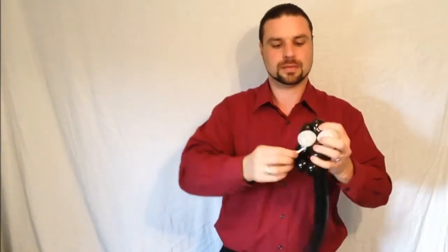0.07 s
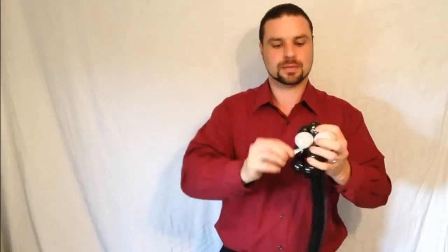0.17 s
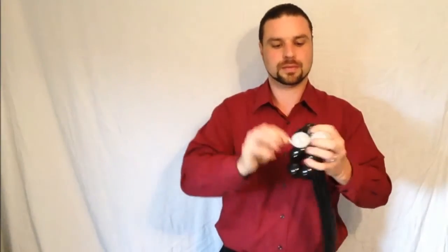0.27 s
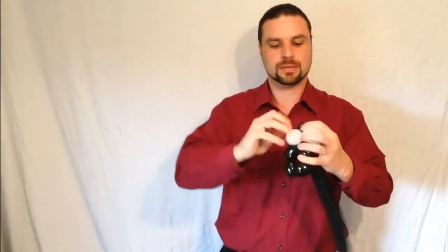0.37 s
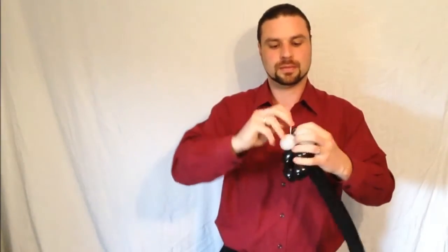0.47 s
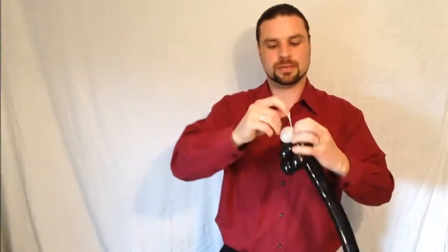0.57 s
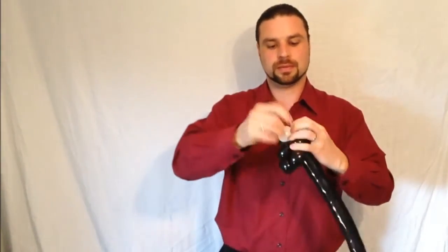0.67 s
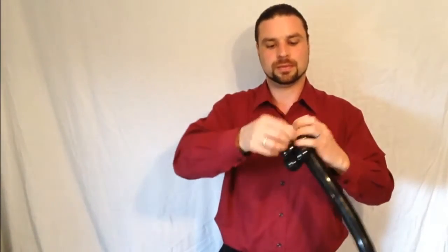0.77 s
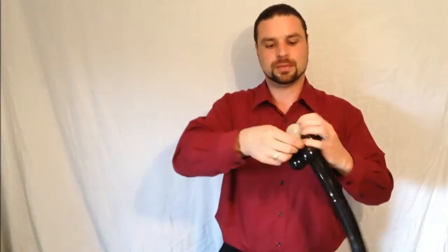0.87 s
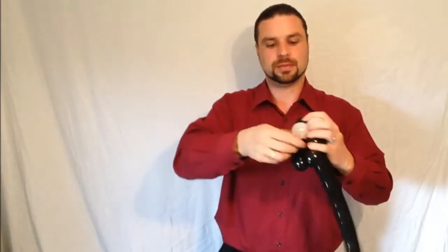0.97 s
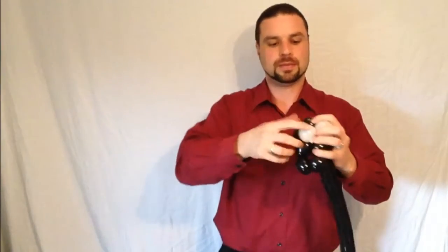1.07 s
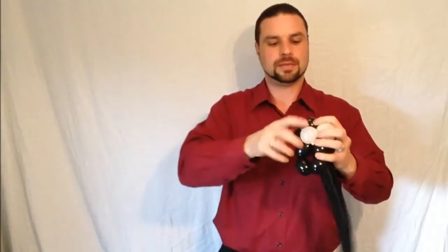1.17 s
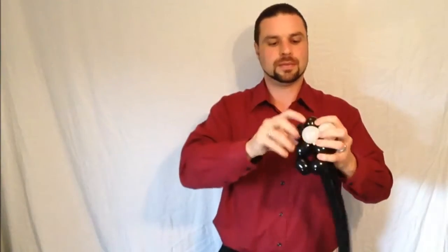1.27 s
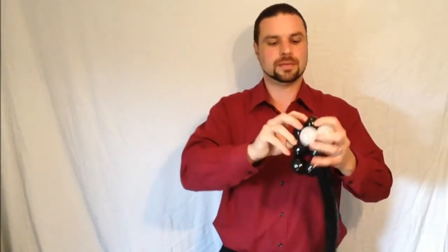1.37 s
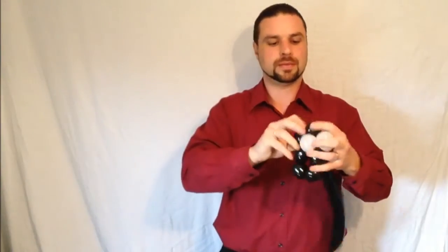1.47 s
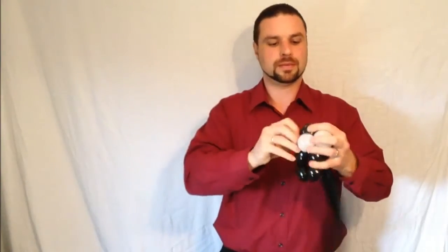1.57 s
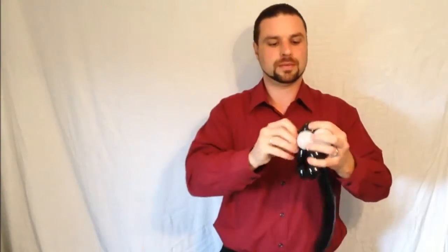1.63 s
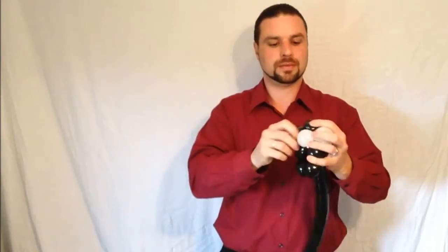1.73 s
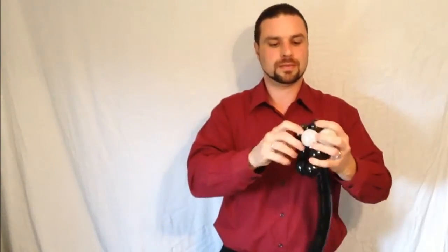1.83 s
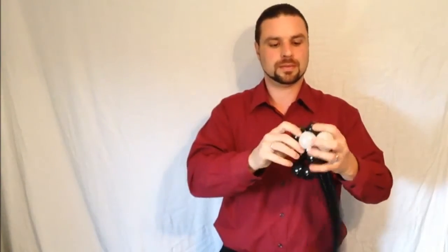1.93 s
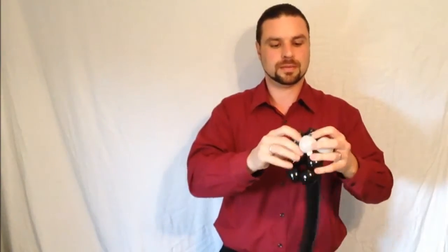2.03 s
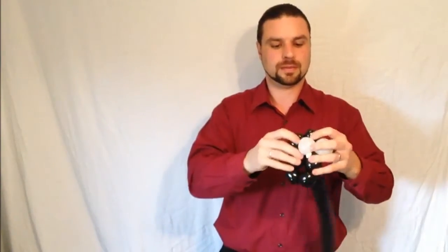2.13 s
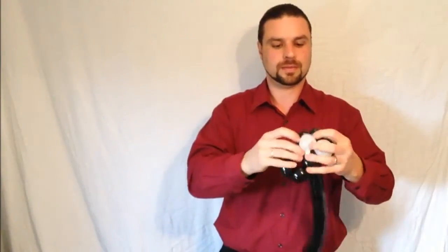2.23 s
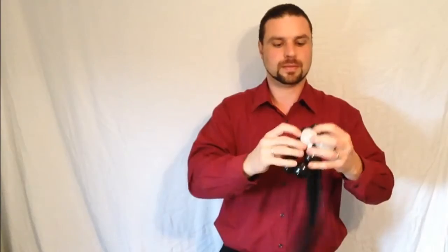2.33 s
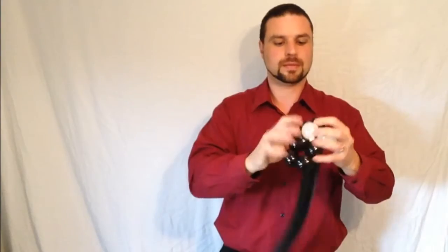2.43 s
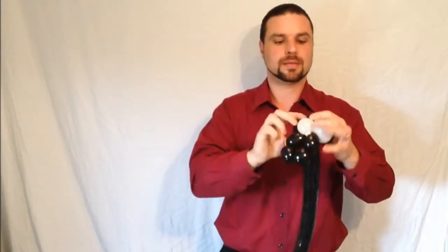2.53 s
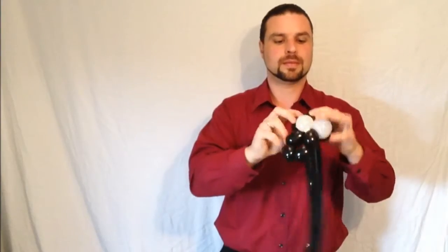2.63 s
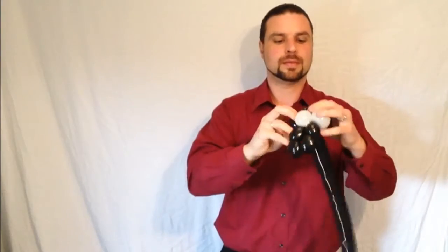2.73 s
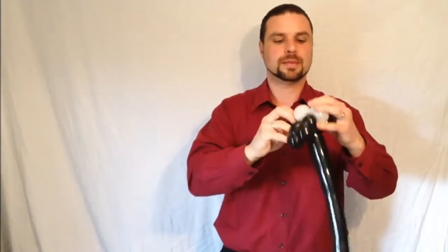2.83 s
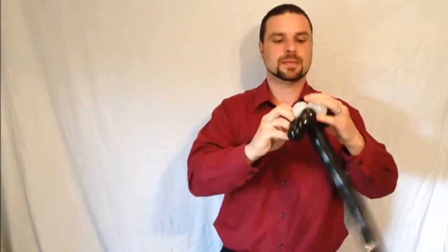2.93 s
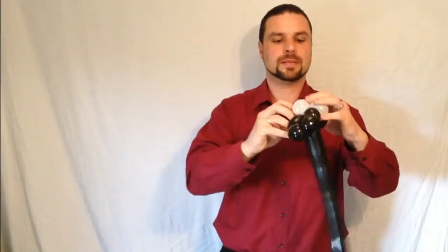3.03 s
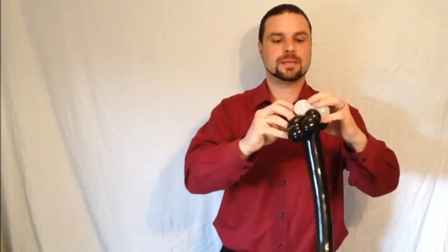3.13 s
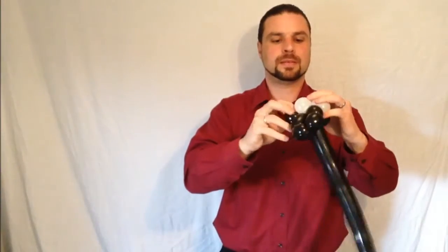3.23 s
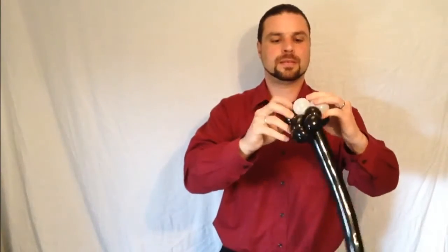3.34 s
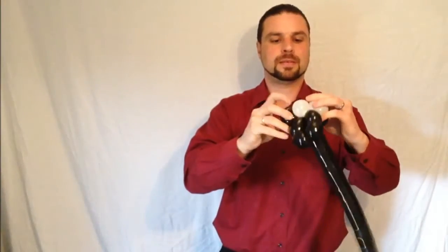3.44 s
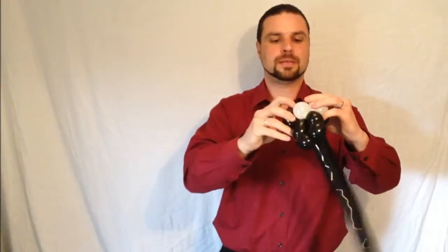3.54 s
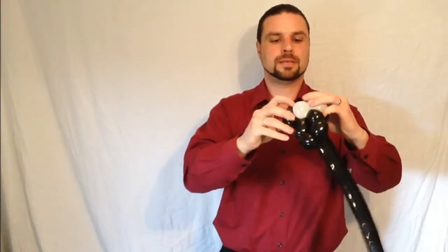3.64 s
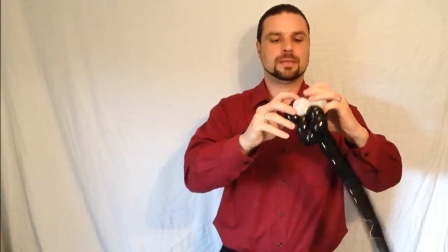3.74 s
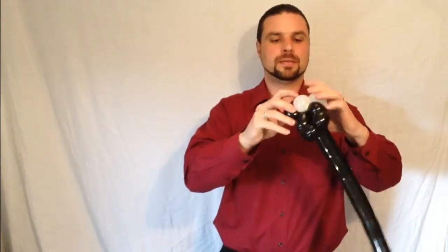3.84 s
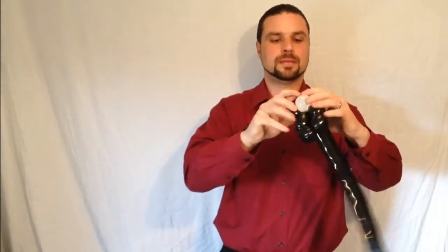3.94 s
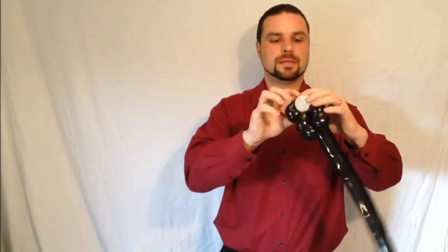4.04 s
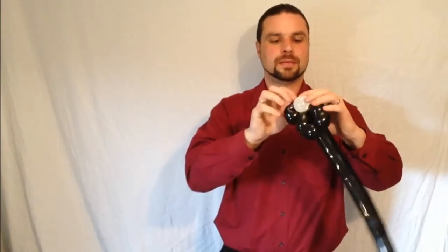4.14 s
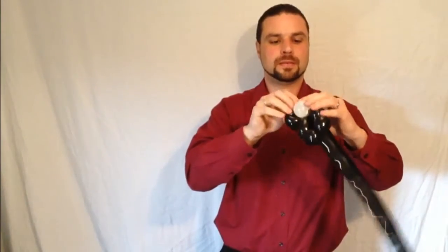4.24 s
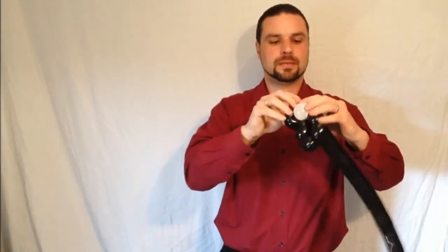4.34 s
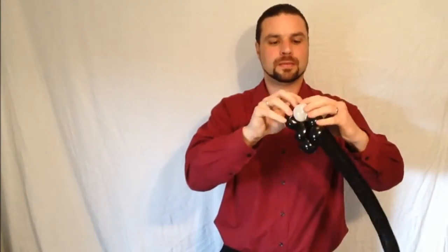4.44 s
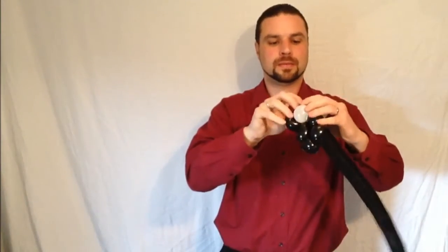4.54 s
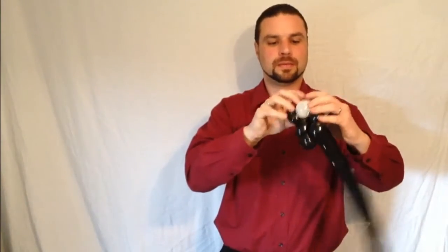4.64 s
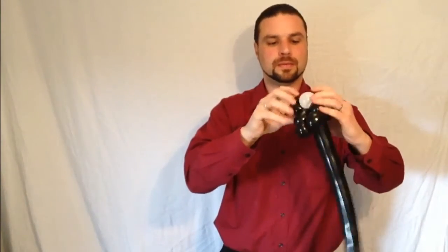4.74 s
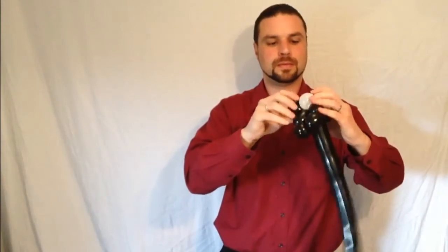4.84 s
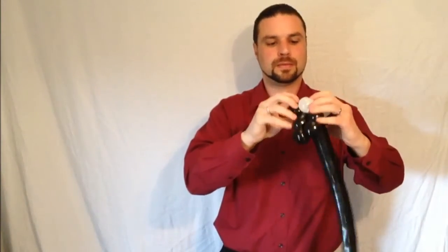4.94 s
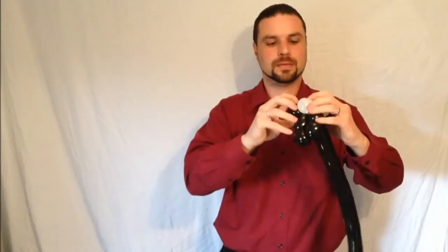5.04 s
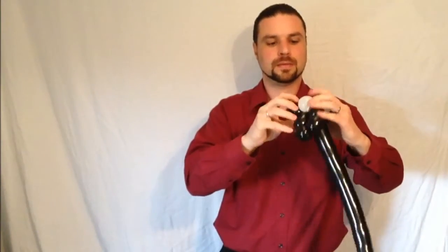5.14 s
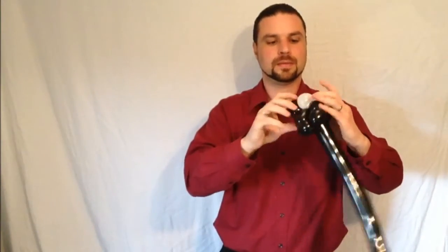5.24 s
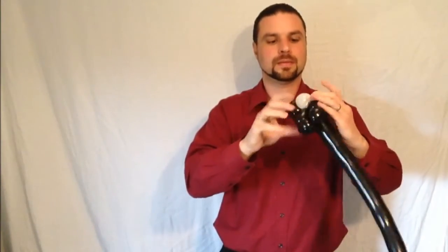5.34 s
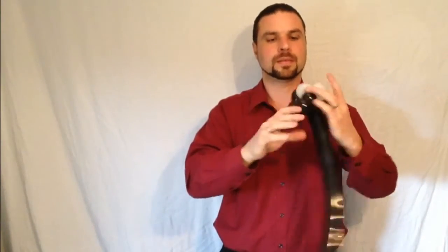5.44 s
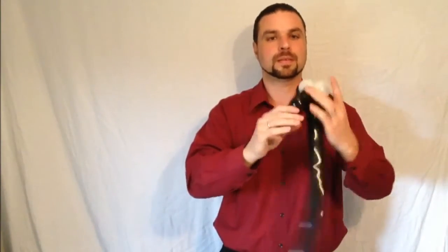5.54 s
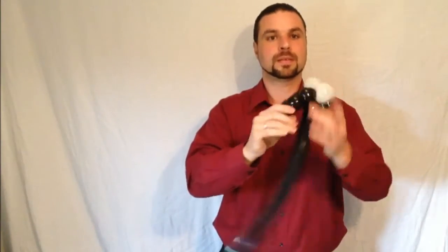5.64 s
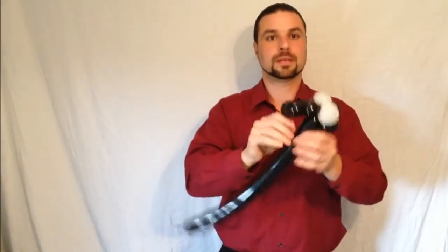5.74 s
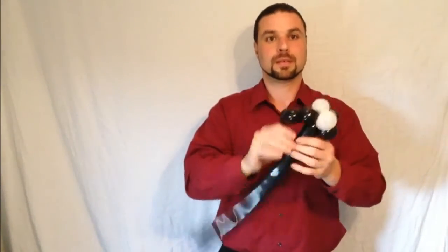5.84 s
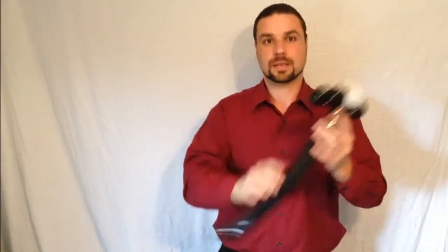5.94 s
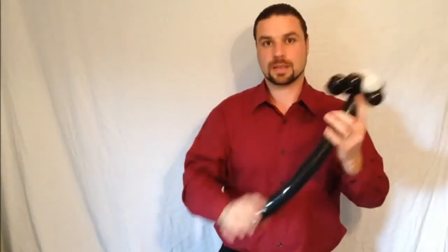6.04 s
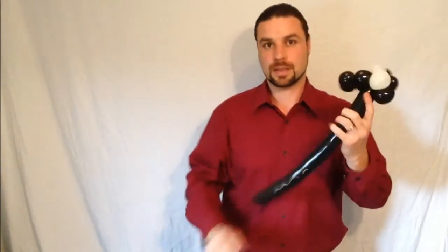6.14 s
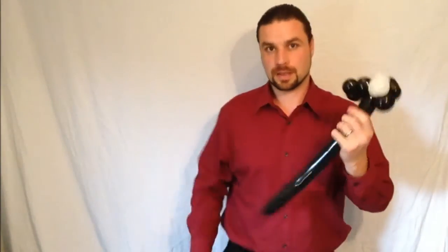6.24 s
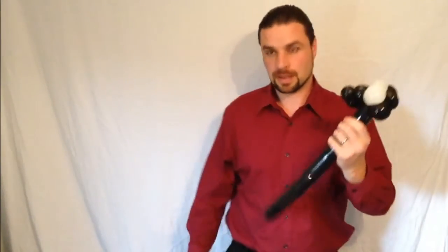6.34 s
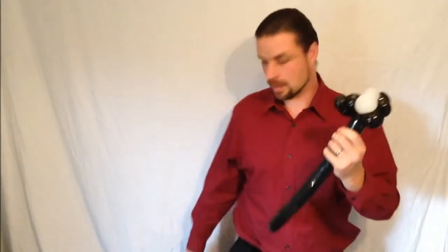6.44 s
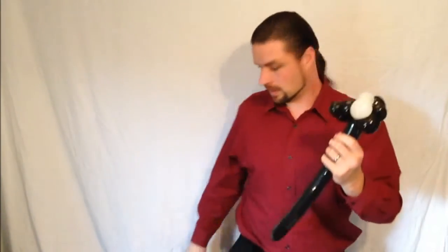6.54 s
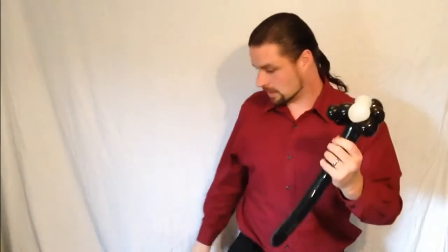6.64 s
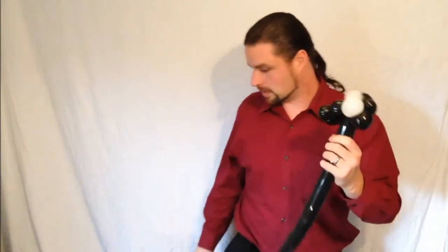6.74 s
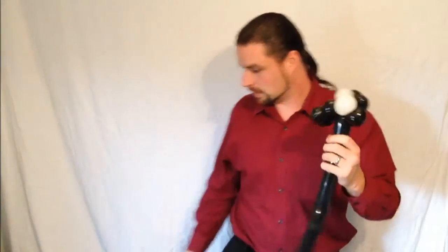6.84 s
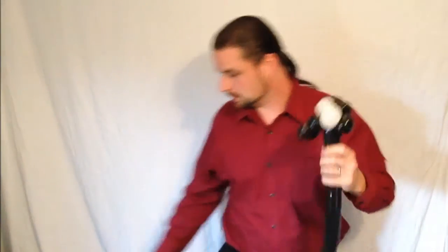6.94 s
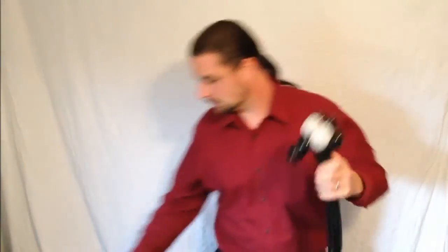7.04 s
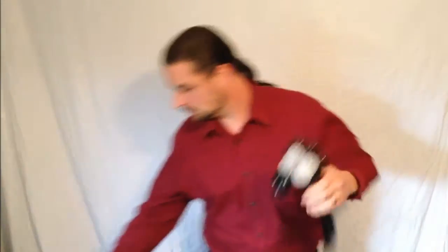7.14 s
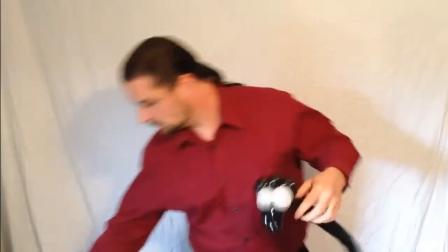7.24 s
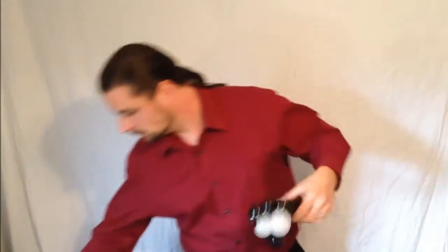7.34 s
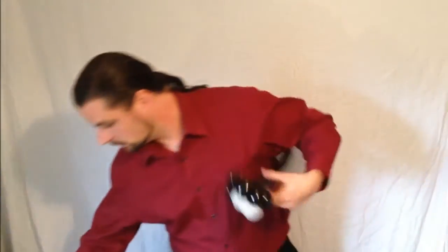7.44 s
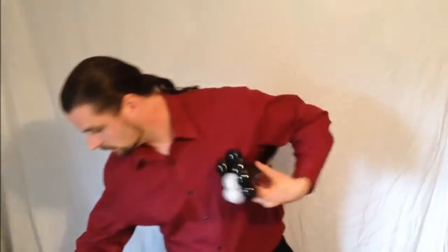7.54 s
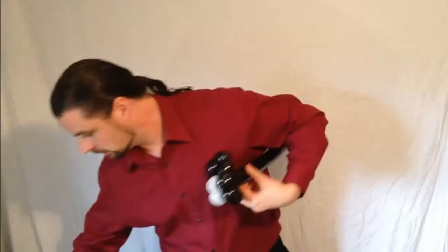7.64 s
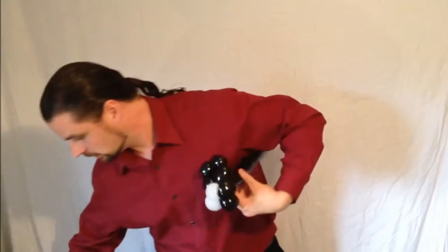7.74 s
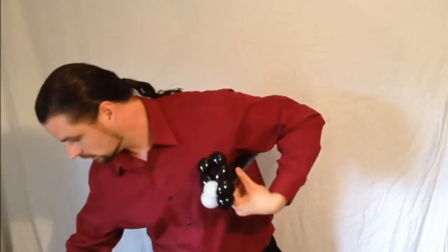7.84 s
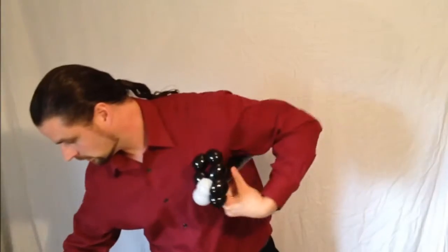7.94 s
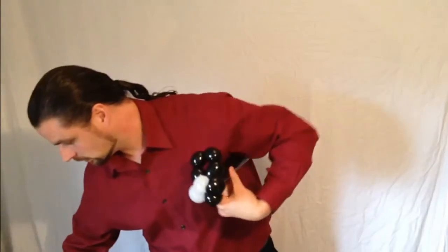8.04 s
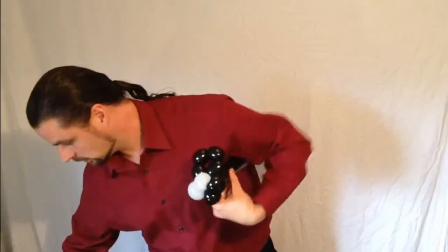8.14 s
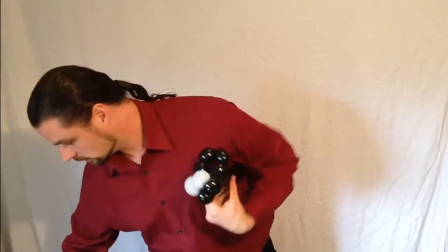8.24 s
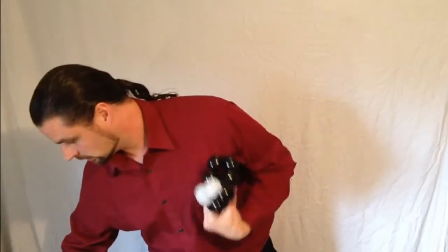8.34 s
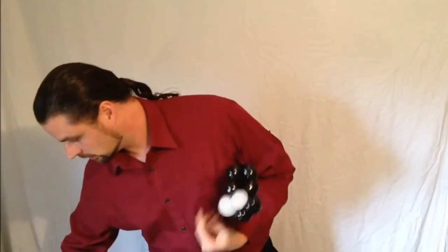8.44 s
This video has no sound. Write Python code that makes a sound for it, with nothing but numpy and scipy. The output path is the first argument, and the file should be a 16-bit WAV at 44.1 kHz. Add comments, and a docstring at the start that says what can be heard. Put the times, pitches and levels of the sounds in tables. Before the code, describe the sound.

Taut rubber sticks and slips under busy fingers: grainy creaks, peeling crackles, hollow knocks and crisp snaps, tightly spaced with tiny gaps. A rough, short squeak rises around one and three-quarter seconds. The bursts thin slightly toward five seconds, then drop sharply in level, leaving small squeaks, light taps and a faint closing rub. Close indoor pickup, short room reflections, low hiss, little deep bass.

```python
"""Inflated latex balloons are twisted together by hand in a small, quiet room with a faint steady hiss.
From the start the rubber sticks and slips: runs of tiny slips creak, patches peel with sharp ticks.
Soon knocks and seams letting go snap, then fast regular slips squeak; each slip rings the taut skin briefly.
After about 5.7 s all contacts are much fainter: the figure is only held and tucked under an arm."""
import sys
import numpy as np
from scipy import signal
from scipy.fft import rfft, irfft, next_fast_len
from scipy.io import wavfile
from scipy.ndimage import uniform_filter1d, map_coordinates

SR = 44100
rng = np.random.default_rng(int(sys.argv[2]) if len(sys.argv) > 2 else 0)


def unload_audio(sound):
    """Save the sound as a 16-bit wav file, at the path given as the first command line argument."""
    columns = np.transpose(np.atleast_2d(sound))
    # keep every value between -1 and 1, then stretch to whole-number steps
    steps = np.round(np.clip(columns, -1, 1) * 32767)
    wavfile.write(sys.argv[1], SR, steps.astype(np.int16))


N = 374850

# still room, spectral density: f/Hz, level/dB (relative)
HISS_SPECTRUM = [(100, -17.5), (204, -8), (1030, -13), (15500, -19)]
# taut skin, spectral density of its ring: f/Hz, level/dB (relative)
SKIN_SPECTRUM = [(100, -62), (150, -21), (255, -11.5), (430, -5), (1010, -3.5), (1380, -1.6), (1620, -3.5),
                 (2120, -1), (8230, -20), (15500, -23.5)]
# where the hands rub, soft bubble to tight twist: t/s, hollow body/dB, crisp treble/dB, held bubble's note f/Hz
GRIPS = [(0.3, 8, 7.5, 1350), (0.75, 2.5, 4.5, 1350), (1.05, 6.5, 2, 1210), (1.5, -7, 5.5, 1298),
         (2.3, 0, 6, 1364), (2.6, 7.5, 1, 760), (3.0, -10.5, 5, 1410), (3.5, 0, 6, 750),
         (3.75, -4.5, 0.5, 814), (4.3, -4.5, 7.5, 1286), (5.0, -5, 3, 870), (5.75, 3, 7.5, 800),
         (6.25, 5.5, 3, 776), (7.8, 13, 14, 648), (8.5, 8, 11, 524)]
# one turn or slide of the hands: start t/s, length t/s, mid level/dB (relative), swell start to end/dB
RUBS = [(0, 0.06, -31, -5.5), (0.174, 0.039, -44.5, -4), (0.238, 0.18, -36, 2), (0.427, 0.23, -31, -6.5),
        (0.737, 0.26, -37, -5), (0.92, 0.45, -38.5, -13.5), (1.349, 0.057, -34.5, 3.5),
        (1.43, 0.26, -26.5, -5), (1.809, .11, -32, 6.5), (1.995, 0.024, -29, -5.5), (2.059, 0.098, -32, 17),
        (2.212, 0.16, -33.5, -2.5), (2.434, 0.077, -32, -8), (2.534, 0.066, -30, 2.5),
        (2.693, 0.37, -33.5, 7), (2.941, 0.046, -28, 14.5), (3.098, 0.061, -30.5, 14),
        (3.214, 0.045, -31.5, 5.5), (3.321, 0.051, -35, -9.5), (3.373, 0.04, -33.5, 17.5),
        (3.51, 0.066, -40.5, -1), (3.589, 0.064, -31, -4.5), (3.673, 0.15, -36, 7),
        (3.919, 0.066, -41, 1.5), (4.076, 0.092, -39, -9.5), (4.222, 0.19, -29, 3.5),
        (4.51, 0.16, -29, -9.5), (4.826, 0.014, -39.5, -5), (4.91, 0.135, -36, 1), (5.081, 0.16, -38.5, 0),
        (5.351, 0.021, -40.5, -2), (5.717, 0.19, -56, -14.5), (5.958, 0.32, -52.5, 2),
        (7.52, 0.05, -61, -2), (7.78, 0.24, -59, -5.5), (8.223, 0.015, -53.5, -7), (8.05, 0.41, -57, 14)]
# seam lets go or finger knocks the skin: t/s, level/dB (relative), body/dB, treble/dB, tear decay t/s
SNAPS = [(0.2463, -28.5, 24, 4, 0.0086), (0.2992, -28, -22, 7.5, 0.00078), (0.4442, -22.5, -4, -1, 0.0037),
         (0.6795, -28, -5, -3, 0.0018), (0.698, -30.5, -8, -1, 0.0017), (0.7534, -24.5, -6, -5, 0.0026),
         (0.9222, -21.5, 3, -8.5, 0.0021), (1.275, -24.5, 2, 4.5, 0.003), (1.357, -31.5, -7, -4, 0.0013),
         (1.6232, -23.5, 2, 8.5, 0.0019), (1.6453, -22.5, 0, 6, 0.0034), (1.6873, -22.5, 2.5, 8, 0.0018),
         (1.6965, -24, 12, 6, 0.002), (2.0072, -31, -2, 3, 0.0015), (2.2, -25, -3, 2.5, 0.002),
         (2.231, -24.5, 15, 0, 0.0029), (2.2387, -20.5, 8.5, 4, 0.0015), (2.404, -23.5, -12, 7, 0.0061),
         (2.7764, -32.5, 1, 17, 0.0011), (2.8219, -12, -5.5, 1.5, 0.0011), (2.854, -28.5, 9, 10.5, 0.0024),
         (3.236, -25.5, -18, 7, 0.0031), (3.4208, -20, 4.5, 6.5, 0.002), (3.578, -28.5, -23, -0.5, 0.0027),
         (3.602, -22.5, -28, 11, 0.0018), (3.923, -35.5, 13, 6.5, 0.0031), (4.3874, -20.5, -15, 5, 0.0024),
         (4.51, -25.5, -6, 6, 0.00075), (4.644, -26.5, -7, 3, 0.0015), (4.8004, -41.5, 5, 4, 0.0012),
         (5.084, -34, 2, 7, 0.0032), (5.2633, -36.5, 5, 6, 0.0026), (5.5574, -36, -7, -2, 0.0032),
         (5.686, -47.5, 22, 13.5, 0.0033), (5.725, -41, 27, -5.5, 0.0034), (5.95, -50.5, 16, -3, 0.0018),
         (6.895, -48, -23, 4, 0.0011), (6.9428, -40, 3, 4, 0.0012), (7.091, -40, -4, 4.5, 0.00078),
         (7.118, -51, 19, 7, 0.0021), (7.2891, -47.5, 23, -5, 0.002), (7.733, -54, 19, -8, 0.002),
         (8.412, -46, 21, -11, 0.01)]
# regular slips: start t/s, length t/s, level/dB, first f/Hz, last f/Hz, tone over buzz/dB, treble/dB
SQUEAKS = [(0.8164, 0.0056, -13, 670, 704, -9, -15), (1.425, 0.021, -19.5, 397, 1607, -28, 8.5),
           (1.743, 0.06, -22, 140.4, 412.7, -44, 7), (4.282, .052, -33.5, 371.6, 445, -3.5, -14),
           (4.966, 0.09, -38, 84.6, 150, -34, -1), (5.121, 0.008, -28.5, 799, 890, -10, 1.5),
           (5.977, 0.029, -52, 1370, 1590, 12, -15), (6.069, 0.026, -50, 843, 776, 7, -10),
           (6.188, 0.017, -51, 734, 825, 1.5, -10.5), (6.237, 0.016, -49.5, 910, 1000, -12, 2),
           (7.157, 0.028, -55.5, 917, 828, 4, -13), (7.828, 0.1, -64.5, 587, 481, 2, -11)]

HISS_RMS_DB = -62.5
GRAB_DB_PER_S, RELEASE_DB_PER_S = 694.5, 294
BUBBLE_PEAK_DB, BUBBLE_WIDTH_HZ, BUBBLE_SHIFT_SHARE = 4, 90, 0.051
ROOM_T60_S, WALL_DELAY_S = 0.17, 0.0074
BASS_CUT_HZ, TOP_HZ = 112, 15500


def amp(db):
    """Decibels to gain."""
    return 10 ** (np.asarray(db) / 20)


def unit(x):
    """x at rms 1."""
    return x / np.sqrt(np.mean(x ** 2))


def along(points, hz):
    """(Hz, value) points read on a log axis."""
    point_hz, values = np.transpose(points)
    return np.interp(np.log(hz + 1), np.log(point_hz + 1), values)


def curves(rows, t):
    """Each column after the time, read at the times t."""
    row_s, *columns = np.transpose(rows)
    return [np.interp(t, row_s, column) for column in columns]


def wander(x):
    """Smooth random curve, one knot per unit of x."""
    return map_coordinates(rng.standard_normal(2048), [x], mode="wrap")


def filtered(x, response):
    """x times a frequency-dependent gain."""
    size = next_fast_len(N + SR // 2)
    hz = np.fft.rfftfreq(size, 1 / SR)
    return irfft(rfft(x, size) * response(hz), size)[:N]


def add(track, start_s, sound):
    """Mix a sound into the track at start_s."""
    start = max(0, round(start_s * SR))
    track[start:start + len(sound)] += sound[:max(0, len(track) - start)]


def hiss():
    """Steady noise of room and microphone: white noise shaped to its spectrum."""
    noise = filtered(rng.standard_normal(N), lambda hz: amp(along(HISS_SPECTRUM, hz)))
    return amp(HISS_RMS_DB) * unit(noise)


def skin(at_s, body_db, treble_db, spread_s, size=2048):
    """One slip's ring, energy 1: the held bubble's note, and peaks and dips of that spot on the skin."""
    hz = np.fft.rfftfreq(size, 1 / SR)
    colour_db = along([(240, body_db), (1000, 0.0021), (2400, 0), (6000, treble_db)], hz)
    nearest_grip = min(GRIPS, key=lambda grip: abs(grip[0] - at_s))
    note_hz = nearest_grip[-1] * (1 + BUBBLE_SHIFT_SHARE * rng.standard_normal())
    bubble_db = BUBBLE_PEAK_DB / (1 + (2 * (hz - note_hz) / BUBBLE_WIDTH_HZ) ** 2)
    spot_db = 1.5 * wander(np.sqrt(hz) / 2.61)
    ring_db = along(SKIN_SPECTRUM, hz) + colour_db + bubble_db + spot_db
    # folded cepstrum: minimum phase, so the ring starts at once
    cepstrum = irfft(np.log(amp(ring_db)))
    cepstrum[1:size // 2] *= 2
    cepstrum[size // 2 + 1:] = 0
    # ripples cross the skin at different speeds
    travel_s = spread_s * wander(np.sqrt(hz) / 10) ** 2
    phase = 2 * np.pi * np.cumsum(travel_s) * hz[1]
    ring = irfft(np.exp(rfft(cepstrum) - 1j * phase))
    ring *= np.hanning(2 * size)[size:]
    return ring / np.linalg.norm(ring)


def slips(rate_hz, uneven, scatter_db):
    """One kick each time the rubber lets go; waits and sizes vary."""
    chance = rng.standard_normal((len(rate_hz) // 2, 2))
    waits = np.exp(uneven * chance[:, 0])  # in slip periods
    at = np.searchsorted(np.cumsum(rate_hz) / SR, np.cumsum(waits) - waits[0] / 2)
    sizes = waits * amp(scatter_db * chance[:, 1])  # a longer hold stores more strain
    return np.bincount(at, sizes, len(rate_hz) + 1)[:-1]


def rasp(kicks, split_hz=3200, spray_s=0.0014, tick_share=0.22):
    """Each slip: a rounded push, and in the treble a tick plus a spray that dies as the rubber sticks again."""
    keep = np.exp(-1 / (spray_s * SR))
    spray_power = signal.lfilter([1 - keep], [1, -keep], kicks ** 2)
    spray = rng.standard_normal(len(kicks)) * np.sqrt(spray_power)
    treble = (spray + tick_share * kicks) / np.hypot(1, tick_share)
    push = signal.lfilter(*signal.butter(2, split_hz, fs=SR), kicks)
    return push + signal.lfilter(*signal.butter(2, split_hz, "highpass", fs=SR), treble)


def effort():
    """Rubbing gain: each rub takes hold, tightens or eases steadily, and lets go."""
    t, power = np.arange(N) / SR, np.zeros(N)
    for start_s, length_s, mid_db, swell_db in RUBS:
        held_db = mid_db + swell_db * (np.clip((t - start_s) / length_s, 0, 1) - .5)
        grab_db = GRAB_DB_PER_S * np.maximum(start_s - t, 0)
        release_db = RELEASE_DB_PER_S * np.maximum(t - start_s - length_s, 0)
        fade_db = grab_db + release_db
        heard = fade_db < 60
        power[heard] += amp((held_db - fade_db)[heard]) ** 2
    return np.sqrt(power)


def rubbing(slip_hz=240, stroke_db=2.5, judder_db=3.0, judder_hz=110, size=3400, count=360, channels=3):
    """Creaks: short overlapping strokes at a few contacts, each on a new spot with its own gliding slip rate."""
    contacts, u = np.zeros((channels, N)), np.linspace(0, 1, size)
    for k, start_s in enumerate(np.linspace(0, N / SR, count, endpoint=False)):
        speed, bend, force = rng.standard_normal(3)
        rate_hz = slip_hz * np.exp(.55 * speed + .8 * bend * (u - .5))
        kicks = rasp(slips(rate_hz, uneven=.22, scatter_db=3.0)) * np.sin(np.pi * u)
        middle_s = start_s + size / SR / 2
        body_db, treble_db, _ = curves(GRIPS, middle_s)
        ring = skin(middle_s, body_db, treble_db, spread_s=0.000405)
        stroke = signal.fftconvolve(kicks, ring) / np.sqrt(rate_hz.mean())
        add(contacts[k % channels], start_s, amp(stroke_db * force) * stroke)
    # level the sum: the contacts share the hands' force
    power = np.abs(uniform_filter1d(contacts.sum(0) ** 2, size=1800))
    levelled = contacts / np.sqrt(power + power.mean() / 9200.0)
    # the whole twist catches and gives in quick jerks
    judder = amp(judder_db * wander(judder_hz * np.arange(N) / SR))
    return amp(-4.5) * effort() * judder * levelled


def crackle(gain_db=20, body_db=-8, treble_db=3, count=520):
    """Tiny patches of rubber peel at random, one sharp tick each; they grow with the hands' effort."""
    track = np.zeros(N)
    for place, size in rng.random((count, 2)):
        at_s = place * N / SR
        add(track, at_s, size * skin(at_s, body_db, treble_db, spread_s=0.0003))
    return amp(gain_db) * effort() * track


def room(dry, wet_db, wall_db=-8, build_s=0.0051, count=100):
    """The nearest wall's echo and a short diffuse tail, both changing as the balloons move."""
    t = np.arange(SR // 5) / SR
    envelope = amp(-60 * t / ROOM_T60_S) * (1 - np.exp(-(t / build_s) ** 2))
    tails = rng.standard_normal((count, len(t))) * envelope
    hop = N // count + 1
    padded, out = np.pad(dry, (hop, 2 * hop)), np.zeros(N + hop)
    for k, tail in enumerate(tails):
        tail = tail / np.linalg.norm(tail)
        add(tail, WALL_DELAY_S * rng.normal(1, .015), [amp(wall_db)])
        piece = padded[k * hop:(k + 2) * hop] * np.sqrt(np.hanning(2 * hop))
        add(out, k * hop / SR, signal.fftconvolve(piece, tail))
    return amp(wet_db) * out[hop:]


def snaps(clean_s=0.0018, spread_share=0.22):
    """A quick tear is one clean kick, a slow one a rasping spray of tiny kicks; both ring the skin."""
    track, t = np.zeros(N), np.arange(SR // 30) / SR
    for at_s, level_db, body_db, treble_db, tear_s in SNAPS:
        spray = rng.standard_normal(len(t)) * np.sqrt(t) * np.exp(-t / tear_s)
        kicks = spray / np.linalg.norm(spray)
        kicks[0] += (clean_s / tear_s) ** 2
        ring = skin(at_s, body_db, treble_db, spread_s=spread_share * tear_s)
        snap = signal.fftconvolve(kicks, ring)
        add(track, at_s, amp(level_db + 26.5) * snap / np.linalg.norm(snap))
    return track


def squeaks():
    """In a tight twist slips lock into a pitch that glides as the rubber stretches; the bubble sings along."""
    track = np.zeros(N)
    for start_s, length_s, level_db, first_hz, last_hz, tone_db, treble_db in SQUEAKS:
        u = np.linspace(0, 1, round(length_s * SR))
        rate_hz = first_hz * (last_hz / first_hz) ** u
        swell = np.abs(np.sin(np.pi * u))
        kicks = slips(rate_hz, uneven=0.021, scatter_db=2.5) * np.sqrt(swell)
        ring = skin(start_s, -9, treble_db, spread_s=0.0013)
        buzz = signal.fftconvolve(rasp(kicks), ring)
        tone = swell * np.sin(2 * np.pi * np.cumsum(rate_hz) / SR)
        squeak = buzz / np.linalg.norm(buzz)
        squeak[:len(u)] += amp(tone_db) * tone / np.linalg.norm(tone)
        # level as rms over the squeak's length
        add(track, start_s, amp(level_db) * np.sqrt(len(u)) * squeak / np.linalg.norm(squeak))
    return track


def scene():
    """Each rubbing contact has its own room reply; snaps, squeaks and crackle share a weaker one; one microphone."""
    rubs = sum(contact + room(contact, wet_db=-0.63) for contact in rubbing())
    near = crackle() + snaps() + squeaks()
    return (rubs + near + room(near, wet_db=-3.0) + hiss())[None]


def record(dry):
    """The recorder clips at full scale, drops the deep bass and has a band limit."""
    clipped = np.clip(dry[0], -1, 1)
    thin = signal.sosfilt(signal.butter(4, BASS_CUT_HZ, "highpass", fs=SR, output="sos"), clipped)
    return filtered(thin, lambda hz: hz < TOP_HZ)[None]


dry = scene()
out = record(dry)
unload_audio(out)
```